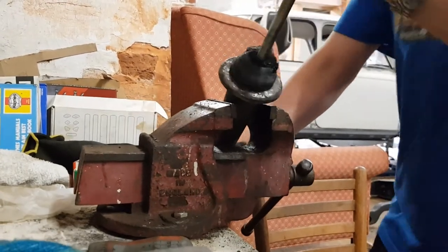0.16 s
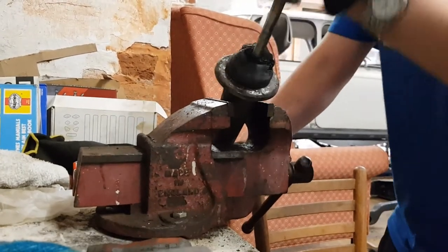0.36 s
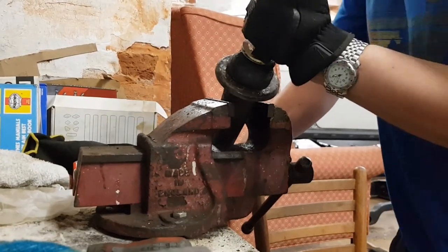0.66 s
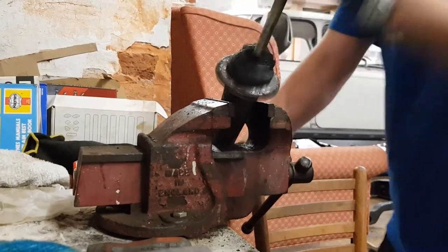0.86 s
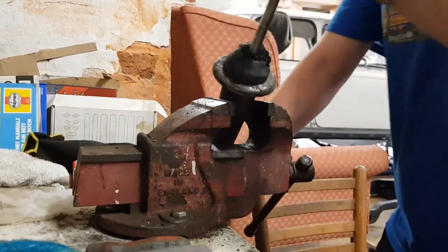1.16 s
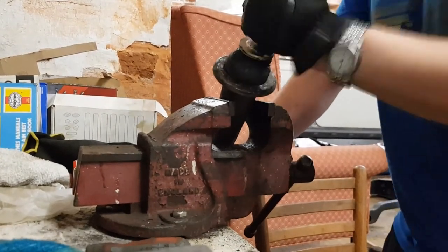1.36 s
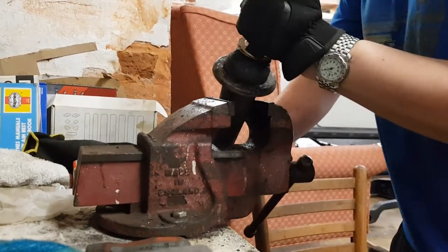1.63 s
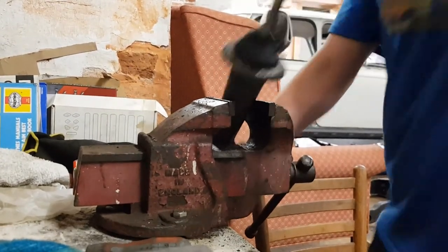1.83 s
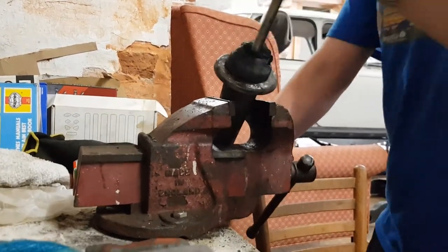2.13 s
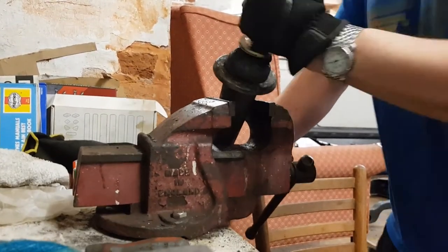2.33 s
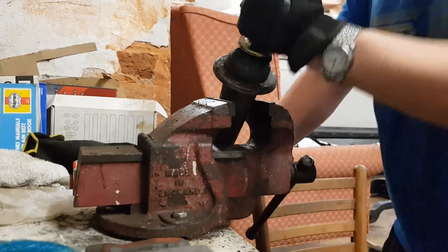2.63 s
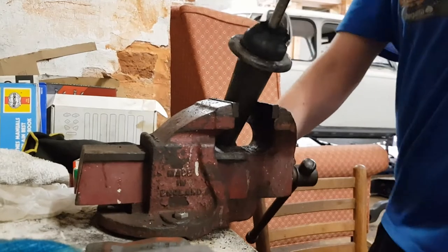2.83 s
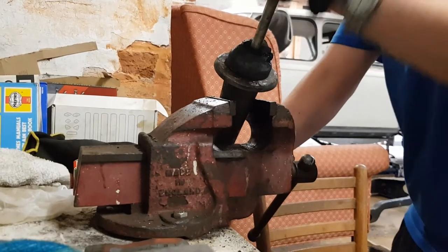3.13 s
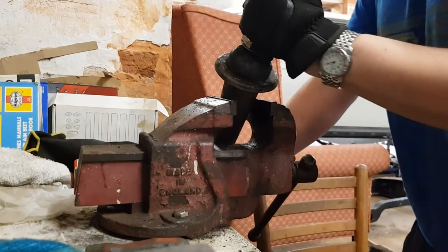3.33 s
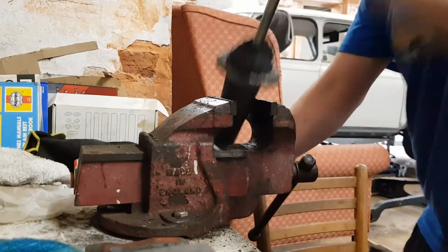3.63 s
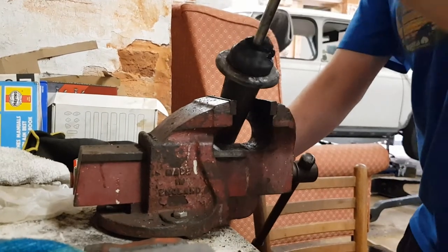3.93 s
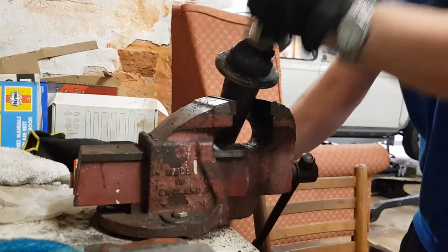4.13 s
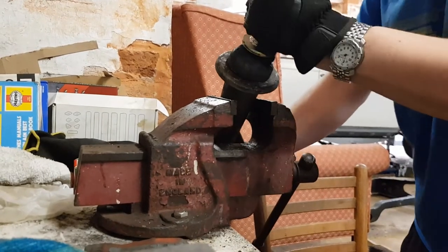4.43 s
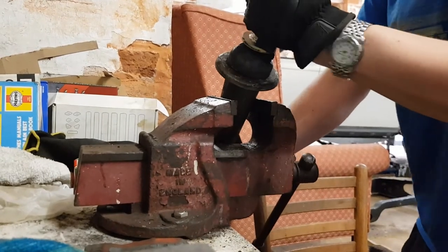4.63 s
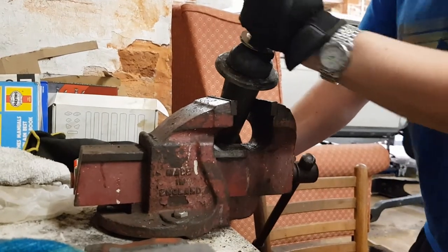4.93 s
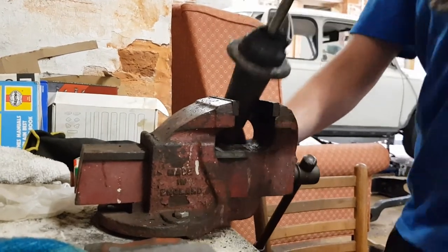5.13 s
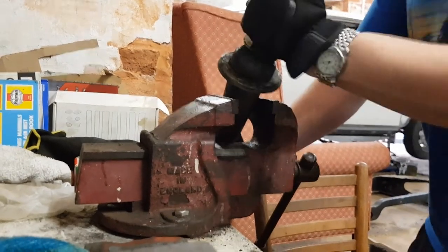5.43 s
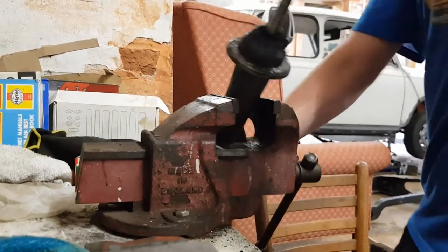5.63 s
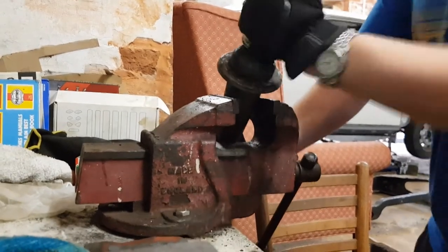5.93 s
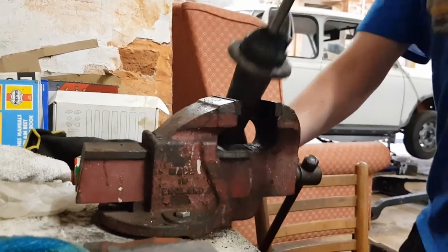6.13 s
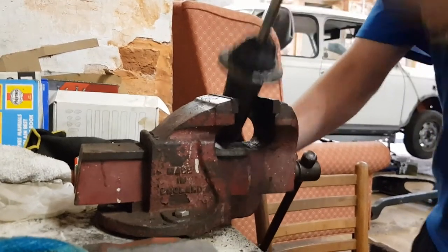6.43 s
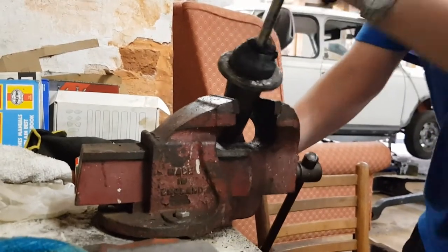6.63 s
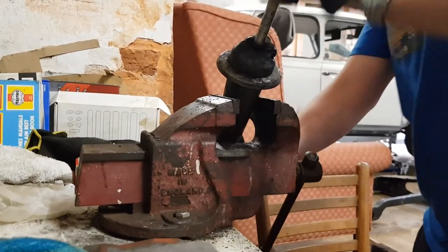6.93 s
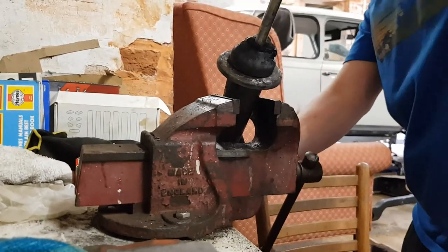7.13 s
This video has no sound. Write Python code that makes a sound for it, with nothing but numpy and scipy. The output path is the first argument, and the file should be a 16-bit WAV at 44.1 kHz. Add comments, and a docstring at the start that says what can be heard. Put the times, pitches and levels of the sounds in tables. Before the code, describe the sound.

A close stereo pickup in a small workshop catches a steel weight sliding on a rod, slightly left. A faint crack opens at 0 s, followed by small clinks and scraping. Hard, bright clangs strike at about 0.9, 1.8, 2.7 and 3.6 s, each with a sharp crack, hollow pock, about a fifth of a second of metallic chatter, thin high ringing and a low bench jolt. Between them the weight rasps back, the rod ticks and rattles, and the part clinks and drops with dry knocks. From 3.9 to 4.9 s there are only lighter taps and slides. The strongest blow lands at 5.0 s, then faster ones at 5.6, 6.0 and 6.4 s, with busy clanks, a firm scrape around 6.25 s and thuds between. Light clinks lead to a weak tap near 7.0 s, then a faint thump and near silence. Echoes are short and dense.

```python
"""A sharp metal crack comes first: a steel weight slides along a rod and slams into its stop.
Each contact is noise that chatters through the rod and vise tones; the weight sings two high tones.
The part in the vise clinks, jumps and drops back with dry knocks, and soft pushes make the bench boom.
Between contacts the sliding weight scrapes. Fading noise echoes give a small workshop's short tail.
A gate pulls quiet moments down further."""
import sys
import numpy as np
from scipy import signal
from scipy.fft import rfft, irfft
from scipy.io import wavfile

SR = 44100
rng = np.random.default_rng(int(sys.argv[2]) if len(sys.argv) > 2 else 0)


def to_wav(s):
    """Save 16-bit WAV."""
    ch = np.atleast_2d(s).T  # columns
    pcm = np.round(np.clip(ch, -1, 1) * 32767)  # PCM
    wavfile.write(sys.argv[1], SR, pcm.astype(np.int16))


N = 320430

# Levels below are relative settings; filters and mixing shape the final loudness.
# Hard blows of the weight on its stop: (time [s], level [dB], treble re level [dB], crack re level [dB],
# chatter time to fall 60 dB [s], collar ring [dB], bench jolt [dB], rocking afterwards [dB])
HARD_BLOWS = [(0.0014, -24.5, -1, 18, 0.31, -59, -36, -43.5), (0.873, -7.5, 5, 3.5, 0.2, -39, -31, -42.5),
              (1.8047, -11.5, 7, 5, 0.24, -26, -36.5, -42.5),
              (2.703, -8, 4, 1.5, 0.21, -18.5, -25.5, -39.5), (3.627, -12, 7, 8, 0.22, -23.5, -31.5, -43),
              (5.03, -6.5, 2, 5.5, 0.22, -24, -29, -37.5), (5.5796, -11.5, 8, 5.5, 0.21, -57, -30.5, -37),
              (6.018, -10, 5.5, 6.5, 0.2, -41, -40, -34.5), (6.4247, -10.5, 6, 8, 0.2, -27, -30, -35),
              (6.984, -29.5, 16, 10.5, 0.069, -64, -39.5, -72)]
# The weight taps the rod or its rests: (time [s], level [dB], treble re level [dB],
# weight ring [dB], chatter time to fall 60 dB [s])
ROD_TAPS = [(.32, -55, -10, -48, .08), (0.3589, -62, -28, -40, 0.043), (0.5739, -47.5, -18, -36, 0.38),
            (0.72, -38, 6, -35, 0.06), (.733, -36.5, 9.5, -27, 0.059), (0.9434, -9, 1, -46, 0.024),
            (1.319, -28.5, 1, -42, 0.062), (1.425, -50, -33, -45, 0.28), (1.5075, -29, -7.5, -32.5, 0.036),
            (1.605, -27.5, 2.5, -32, 0.024), (1.784, -20, 8.5, -22, 0.18), (2.271, -32, -13, -36, 0.1),
            (2.2977, -18.5, -10, -28.5, 0.028), (2.445, -49, 1, -38, 0.037), (2.4557, -34, 0, -35.5, 0.048),
            (2.58, -42.5, 4.5, -33, 0.49), (3.145, -45, -3, -36, .08), (3.1788, -29, -23, -41, 0.15),
            (3.263, -44.5, -7, -46, 0.038), (3.291, -43, -6, -42, 0.036), (3.321, -41.5, -4, -55, 0.037),
            (3.4316, -29.5, 8.5, -26.5, 0.041), (3.5177, -52.5, 12.5, -32.5, 0.27),
            (3.572, -55, 9, -39.5, 0.041), (4.0494, -41, -19, -36, 0.055),
            (4.0574, -30.5, -29, -30.5, 0.13), (4.1403, -21, -24, -37, 0.056),
            (4.1594, -30, -22, -46, 0.038), (4.2223, -60, -3, -32.5, 0.024), (4.4447, -44, 14, -24.5, 0.2),
            (4.574, -36, -17, -41, 0.061), (4.599, -45, -1, -48, .04), (4.65, -64.5, 3, -52, .05),
            (4.681, -54.5, 18, -39, 0.047), (4.935, -62.5, -9, -51.5, 0.04),
            (5.262, -46, -10, -42.5, 0.069), (5.343, -17.5, -3, -51, 0.024),
            (5.3515, -12.5, 2.5, -27.5, 0.065), (5.452, -44, -10, -37, 0.1),
            (5.534, -28.5, -14.5, -58, 0.087), (5.5575, -27.5, 20.5, -59, 0.061),
            (5.7225, -17, -13, -46, 0.083), (5.768, -18.5, -19, -39, 0.062), (5.8175, -12, 1.5, -26, 0.061),
            (5.845, -37, -2, -38, 0.077), (5.9467, -34.5, -18, -43.5, 0.33), (6.0058, -19, 7.5, -27, 0.077),
            (6.25, -16.5, -8, -32, 0.12), (6.322, -45, -11, -36.5, 0.075), (6.413, -30.5, 16.5, -18, 0.084),
            (6.7336, -16, 4.5, -44, 0.026), (6.7562, -43, -8, -25.5, 0.026), (6.937, -47, 6, -23, 0.11),
            (6.964, -23, 1, -26.5, 0.041), (6.977, -23, 16, -41, 0.05)]
# The part clinks in the vise jaws: (time [s], level [dB], body re level [dB])
JAW_CLINKS = [(0.14, -25, -1), (0.411, -25, 1), (0.4803, -30.5, -7.5), (0.542, -34, -4), (.591, -56, -7),
              (.651, -40, -4), (1.088, -29, 1), (1.198, -29, 3), (1.279, -35, 8.5), (1.355, -23.5, -0.5),
              (1.364, -22.5, -11), (2.026, -48.5, 24), (2.129, -34.5, 7.5), (2.178, -52, 3),
              (2.31, -16, -4.5), (2.398, -38, -3.5), (2.541, -45, -4), (3.0122, -25.5, 1.5),
              (3.112, -38.5, -0.5), (3.345, -37, 1), (3.9065, -34.5, 2), (3.9414, -26, -5),
              (4.252, -32, -38), (4.725, -43.5, -12.5), (4.9025, -62.5, 25), (5.168, -30.5, 16.5),
              (5.238, -19.5, -10), (5.828, -16, -6), (6.079, -26.5, 12.5), (6.267, -27, -13),
              (6.561, -37.5, 17.5), (6.592, -40, 2), (6.643, -32.5, 10), (6.898, -39, 8)]
# Longer loose rattles of the rod: (time [s], level [dB], body re level [dB], treble re level [dB])
ROD_RATTLES = [(0.808, -31.5, -2.5, -12), (.829, -30.5, -9, -1), (1.7368, -37.5, 2.5, -36),
               (2.154, -38.5, 4, -9), (3.137, -39.5, 1, 0), (3.555, -47, 4, -5.5), (3.584, -52, 0, -9),
               (4.007, -49.5, 11, -26), (4.4978, -40.5, -2, -15), (4.933, -36.5, 2, -23),
               (4.984, -24, -8.5, -18), (5.2845, -38, 5.5, -27), (6.167, -25.5, -1, -16),
               (6.374, -34, 1.5, -4), (6.682, -31.5, -1.5, -13), (6.932, -60, -1, 27.5)]
# The weight is slid back down the rod: (time of fastest sliding [s], scrape [dB])
BACK_SLIDES = [(.38, -45), (1.33, -44), (2.24, -56), (3.1, -49), (4.17, -42.5), (4.548, -56), (5.2, -48),
               (5.798, -39), (6.25, -33.5), (6.599, -39)]
# The part drops back on the vise: (time [s], knock [dB], boom re knock [dB])
PART_LANDINGS = [(0.234, -26, -6.5), (.305, -40, 3), (.945, -30.5, -9.5), (1.091, -34, -1),
                 (1.166, -25.5, -5), (2.025, -34, -34), (2.133, -22, -6.5), (2.956, -26, -8),
                 (3.698, -30, -9), (3.821, -29, -6), (4.149, -33.5, -9.5), (5.165, -31.5, -1.5),
                 (5.258, -30.5, 5), (5.478, -32.5, -8), (5.83, -27, -1.5), (6.168, -27.5, -20),
                 (6.563, -31.5, -7), (6.649, -21, -8.5)]
# The vise lurches and jolts the bench: (time [s], knock [dB])
VISE_LURCHES = [(0.143, -37.5), (0.466, -41.5), (0.723, -58), (1.36, -38.5), (1.872, -37), (2.3, -37.5),
                (3.186, -40), (3.432, -55.5), (4.5, -43), (4.598, -52), (4.686, -49), (4.975, -39.5),
                (5.366, -33), (6.273, -29), (7.147, -57)]
# Body, middle and treble of a contact: (edge or edges [Hz], filter kind)
CONTACT_BANDS = [(3000, "low"), ([3000, 8500], "band"), (8500, "high")]
# Tone colour of the broad clang: (pitch [Hz], relative level [dB])
CLANG_COLOUR = [(290, -46), (500, 19), (679, 15.5), (1250, 17), (1350, 19), (1800, 17.5), (3460, 7),
                (4700, 10), (5210, 20.5), (5930, 8.5), (6970, 13), (7490, 13), (11900, 9.5), (15100, 6),
                (16200, 3.5)]
# Rod and vise tones: (pitch [Hz], width [Hz], under a hard blow [dB], under a light contact [dB])
ROD_TONES = [(1292, 82, 12.5, 13), (1600, 130, 4, -2), (1825, 40, 3.5, 16.5), (1915, 700, 0.5, 3.5),
             (2220, 11, -5.5, -12), (2673, 35, -9, 14), (4600, 120, 9.5, 10.5), (3844, 110, -6, -5.5),
             (4214, 65, -2, 7), (4550, 420, -4.5, -6), (5980, 263, 1.5, -0.5), (6335, 50, 10, -1),
             (7550, 560, -3, 3), (7630, 110, 6, 14.5), (8520, 38, 11, 18.5), (11700, 170, -6, 16),
             (12460, 150, 6.5, 1), (13800, 450, -2, 3)]
# Neighbours of each rod tone: (steps from its pitch [cluster spacings])
CLUSTER_STEPS = [-1, 0, 1]
# The weight's split pair of tones, which beat: (pitch [Hz])
WEIGHT_PITCHES = [9576, 9748]
# How long those two tones ring: (time to fall 60 dB [s])
WEIGHT_RING_TIMES = [0.27, 0.22]
# Bench tones: (pitch [Hz], level [dB], time to fall 60 dB [s])
BENCH_TONES = [(59.3, 7, 0.15), (118.1, 5, 0.16), (206.2, 8, 0.044), (272.3, 6, 0.03), (323.3, -5, 0.044),
               (412.8, -14.5, 0.23), (553, -18.5, 0.17), (740, 0.5, 0.019), (856, -12.5, 0.051)]
# Tones of the dry knock: (pitch [Hz], level [dB], time to fall 60 dB [s], at least 0.005 when rung)
KNOCK_TONES = [(451, 8.5, 0.011), (802, -5, 0.018), (1210, -15, 0.0065), (1860, -11, 0.0023)]
# How long the workshop answers: (pitch [Hz], time to fall 60 dB [s])
SHOP_TIMES = [(100, 0.22), (400, 0.31), (1500, 0.46), (5000, 0.32), (15000, 0.22)]
# How strongly the workshop answers: (pitch [Hz], tail level [dB])
SHOP_LEVELS = [(80, -14.5), (300, -8.5), (800, -4), (4000, -1), (15000, -2.5)]

BLOW_BODY_DB, BLOW_BODY_PER_TREBLE, BLOW_RING_DB = -6, 0.022, -32
BLOW_RISE_S, BLOW_CLICK_DB = 0.015, 4.5   # chatter swells after the crack; click is re crack
COLLAR_HZ, COLLAR_T60_S = 5779, 0.04
POCK_HZ, POCK_T60_S, POCK_DB = 1500, 0.0075, -8.5
TAP_BODY_DB, BODY_PER_TREBLE = -4, -0.72
BODY_PER_STRENGTH, FIRM_TAP_DB = 0.049, -39.5
CLINK_TREBLE_DB, CLINK_RING_DB, CLINK_T60_S = -9.5, -34, 0.043
RATTLE_RING_DB, RATTLE_T60_S = -16, 0.32
HARD_SPREAD, LIGHT_SPREAD = 0.014, 0.005   # cluster spacing, share of the pitch
CLUSTER_BLOCK, CLUSTER_LUCK_DB = 900, 7.5   # tones take turns about every 20 ms (block in samples)
GRIP_FLUTTER, GRIP_HZ = 0.35, 60
NICKS_PER_S, NICK_DB = 60, 17   # burrs caught by the sliding weight
SLIDE_FADE_DB_PER_S = 96
THROW_DB, THROW_RISE_DB_PER_S = -33.5, 118
THROW_S, FLIGHT_S = 0.05, 0.005   # the throw scrapes briefly, then the weight flies free
LAND_DEEP_DB = -21.5
LURCH_BOOM_DB, LURCH_DEEP_DB = 3, 6
JOLT_BOOM_DB, JOLT_DEEP_DB, JOLT_LAG_S = -2.5, 6, 0.004615
BOUNCE_S, BOUNCE_DB = 0.0085, -12   # the part bounces once more
SETTLE_DB, SETTLE_FADE_DB_PER_S = -3.5, 98.5
ROCK_RISE_S, ROCK_HOLD_S = 0.03, 0.13
ROCK_RISE_DB_PER_S, ROCK_FADE_DB_PER_S = 157, 53.5
RIGHT_LAG = 17   # samples by which the right side hears the metal later
BASS_CUT_HZ, CUTOFF_HZ = 74.6, 15850
GATE_DB, GATE_SLOPE, GATE_RELEASE_S = -62, 0.8, 0.03   # slope: extra dB down per dB below threshold


def blows():
    """Hard blows open with a hollow pock and shake the collar, which rings on noise for a while."""
    s, level, treble, crack_db, t60, collar, _, _ = np.transpose(HARD_BLOWS)
    body = BLOW_BODY_DB + BLOW_BODY_PER_TREBLE * treble
    rows = s, level, body, treble, np.full(len(s), BLOW_RING_DB), t60
    clang = contacts(rows, chatter_db=-4.5, crack_db=crack_db, crack_s=0.013,
                     modes_db=np.transpose(ROD_TONES)[2], luck_db=5.5, ring_db=-12.0,
                     rise_s=BLOW_RISE_S, click_db=BLOW_CLICK_DB, spread=HARD_SPREAD)
    shaken = rng.standard_normal(N) * bursts(s, collar - 15, 0.57 * t60, 0.01)
    pock = ring(clicks(s, amp(level + crack_db + POCK_DB)), POCK_HZ, POCK_T60_S)
    return clang + pock + ring(shaken, COLLAR_HZ, COLLAR_T60_S)


def light_contacts():
    """Taps, clinks and rattles in time order; bright taps have less body, firm taps more."""
    rows = []
    for s, db, treble, sing, t60 in ROD_TAPS:
        body = TAP_BODY_DB + BODY_PER_TREBLE * max(treble, 0)
        body += BODY_PER_STRENGTH * (db - FIRM_TAP_DB)
        rows.append((s, db, body, treble, sing, t60))
    for s, db, body in JAW_CLINKS:
        rows.append((s, db, body, CLINK_TREBLE_DB, db + CLINK_RING_DB, CLINK_T60_S))
    for s, db, body, treble in ROD_RATTLES:
        rows.append((s, db, body, treble, db + RATTLE_RING_DB, RATTLE_T60_S))
    return contacts(np.transpose(sorted(rows)), chatter_db=-2.5, crack_db=-10.0, crack_s=0.025,
                    modes_db=np.transpose(ROD_TONES)[3], luck_db=10.5, ring_db=-5.0,
                    rise_s=0.0051, click_db=-2.5, spread=LIGHT_SPREAD)


def contacts(rows, chatter_db, crack_db, crack_s, modes_db, luck_db, ring_db, rise_s, click_db, spread):
    """A crack, then chatter through the broad clang and the rod tones; the weight rings on."""
    s, level, body, treble, sing, t60 = rows
    drive, crack_noise = 0, rng.standard_normal(N)
    for (edge, kind), db in zip(CONTACT_BANDS, (level + body, level, level + treble)):
        chatter = grit(4.8, alike=0.024) * bursts(s, db + chatter_db, t60, rise_s)
        crack = crack_noise * bursts(s, db + crack_db, np.full(len(s), crack_s), 0.0005)
        click = clicks(s + 0.0012, amp(db + crack_db + click_db))
        drive = drive + filtered(chatter + crack + click, edge, kind)
    # each contact favours other tones, until the next one takes over
    latest = np.maximum(np.searchsorted(s, np.arange(N) / SR) - 1, 0)
    favoured_db = modes_db + luck_db * rng.uniform(-1.5, 0.5, (len(s), len(ROD_TONES)))
    shiver = rng.standard_normal((2, N)) * bursts(s, sing + ring_db - 32.0, t60, 0.0022)
    clang = colour(drive, CLANG_COLOUR)
    rod = rod_modes(drive, favoured_db[latest].T, spread)
    return clang + rod + weight(clicks(s, amp(sing + ring_db)) + shiver)


def rod_modes(drive, db, spread):
    """Rod and vise tones side by side; the loose fit keeps shifting which tone of each cluster speaks."""
    out = 0
    turns = rng.uniform(-1.5, 1, (len(ROD_TONES), len(CLUSTER_STEPS), N // CLUSTER_BLOCK + 2))
    for k, (hz, width, *_) in enumerate(ROD_TONES):
        t60 = np.log(1000) / (np.pi * width)   # a wider tone dies sooner
        for step, turn in zip(CLUSTER_STEPS, turns[k]):
            turn_db = CLUSTER_LUCK_DB * np.interp(np.arange(N) / CLUSTER_BLOCK, np.arange(len(turn)), turn)
            tone = ring(drive * amp(db[k] + turn_db - 6.5), hz * (1 + spread * step), t60)
            out = out + (-1) ** k * tone * 2 * np.pi * width / SR
    return out


def weight(jolts):
    """The sliding weight's two long tones, alike at both sides; the gripping hand makes them flutter."""
    grip = filtered(rng.standard_normal((2, N)), GRIP_HZ, "low")
    flutter = 1 + GRIP_FLUTTER * grip / np.std(grip)
    # each row of jolts drives one tone
    return sum(ring(jolt, hz, t60) * shake
               for jolt, hz, t60, shake in zip(jolts, WEIGHT_PITCHES, WEIGHT_RING_TIMES, flutter))


def sliding_level():
    """Scrape level in dB: short throws up into each blow, and slides back down the rod."""
    s, level, *_ = np.transpose(HARD_BLOWS)
    thrown_db = swells(s, level + THROW_DB, THROW_RISE_DB_PER_S, 0, 0)
    now = np.arange(N) / SR
    until_blow = np.append(s, 2 * N / SR)[np.searchsorted(s, now)] - now
    throwing = (until_blow < THROW_S) & (until_blow > FLIGHT_S)
    thrown_db = np.where(throwing, thrown_db, -120)
    slid_db = swells(*np.transpose(BACK_SLIDES), SLIDE_FADE_DB_PER_S, 0, SLIDE_FADE_DB_PER_S)
    return np.maximum(thrown_db, slid_db)


def scrape(db):
    """The weight rubs and rattles along the rod and keeps its tones going, now one, now another."""
    caught = rng.random(N) < NICKS_PER_S / SR
    nicks = caught * amp(NICK_DB + 6.6 * rng.standard_normal(N))
    rub = (grit(9.2, alike=0.33) + nicks) * amp(db)
    wander_db = rng.uniform(-8, 8, (N // 1800 + 1, len(ROD_TONES)))
    wander_db = np.repeat(wander_db, 1800, axis=0)[:N]   # new strengths about every 41 ms
    dull = filtered(colour(rub, CLANG_COLOUR), 9000, "low")
    rod = rod_modes(rub, (np.transpose(ROD_TONES)[3] + wander_db).T, LIGHT_SPREAD)
    return amp(-1.0) * dull + amp(-15.0) * rod + amp(-45.0) * weight(rub)


def thuds():
    """Rows (time [s], knock [dB], boom [dB], deep boom [dB]): landings are dry, blows and lurches boom."""
    landings = [(s, db, boom, LAND_DEEP_DB) for s, db, boom in PART_LANDINGS]
    lurches = [(s, db, LURCH_BOOM_DB, LURCH_DEEP_DB) for s, db in VISE_LURCHES]
    jolts = [(s + JOLT_LAG_S, db, JOLT_BOOM_DB, JOLT_DEEP_DB) for s, *_, db, _ in HARD_BLOWS]
    return landings + lurches + jolts


def bench_rumble():
    """Rumble level in dB: every thud leaves a shudder, and each blow leaves the bench rocking."""
    thud_s, knock_db, boom_db, _ = np.transpose(thuds())
    settle_db = swells(thud_s, knock_db + boom_db + SETTLE_DB, 2000, 0, SETTLE_FADE_DB_PER_S)
    s, *_, rock_db = np.transpose(HARD_BLOWS)
    rocking_db = swells(s + ROCK_RISE_S, rock_db, ROCK_RISE_DB_PER_S, ROCK_HOLD_S, ROCK_FADE_DB_PER_S)
    return np.maximum(settle_db, rocking_db)


def bench(rumble_db):
    """Soft pushes set the bench tones booming; a short knock opens each; rocking keeps it humming."""
    s, knock, boom_re, deep_re = np.transpose(thuds())
    shape = len(s), len(BENCH_TONES)
    luck = amp(rng.uniform(-4, 4, shape)) * rng.choice([-1, 1], shape)   # fresh strengths each time
    rocking = amp(rumble_db - 28.0) * rng.standard_normal(N)
    boom = np.zeros(N)
    for k, (hz, db, t60) in enumerate(BENCH_TONES):
        share = deep_re if hz < 80 else boom_re if hz < 290 else 0
        push = clicks(s, amp(knock + share + db) * luck[:, k]) + amp(db) * rocking
        half_cycle = np.hanning(round(SR / hz / 2)) * 4 * hz / SR   # how long the push lasts
        boom += ring(signal.oaconvolve(push, half_cycle)[:N], hz, t60)
    first, again = rng.uniform(-3, 3, (2, len(KNOCK_TONES), len(s)))
    knocks = 0
    for k, (hz, db, t60) in enumerate(KNOCK_TONES):
        hit = clicks(s, amp(knock + db + first[k]))
        bounce = clicks(s + BOUNCE_S, amp(knock + db + BOUNCE_DB + again[k]))
        knocks = knocks - ring(hit + bounce, hz, t60)
    rattle = rng.standard_normal(N) * bursts(s, knock - 6, np.full(len(s), 0.07), 0.00062)
    return boom + knocks + filtered(rattle, [250, 2300], "band")


def shop(x):
    """Dense echoes made of fading noise, different at each ear, lasting longest in the middle range."""
    t, tail = np.arange(SR // 2) / SR, 0
    edges = 60 * 2 ** np.arange(0, 8.6, 0.5)   # half-octave bands [Hz]
    white = rng.standard_normal((2, 2, len(t)))
    for k, (low, high) in enumerate(zip(edges, edges[1:])):
        hz = np.sqrt(low * high)
        t60 = max(at_hz(SHOP_TIMES, hz), 0.05)
        band = filtered(white[k % 2], [low, high], "band")
        even_energy = np.sqrt(6 * np.log(10) / (t60 * SR))   # offsets the extra energy of a longer tail
        tail = tail + band * amp(at_hz(SHOP_LEVELS, hz) - 60 * t / t60) * even_energy
    tail = tail * np.clip(t / 0.00045, 0, 1)   # a very short fade-in
    return signal.fftconvolve(x[None], tail, axes=1)[:, :N]


def amp(db):
    """Gain of a dB value."""
    return 10 ** (np.asarray(db) / 20)


def filtered(x, edge, kind):
    """Keep one range of pitches with gently sloping edges."""
    return signal.sosfilt(signal.butter(2, edge, kind, fs=SR, output="sos"), x)


def at_hz(points, hz):
    """Read a curve over pitch, with pitch spaced logarithmically as in hearing."""
    p = np.array(points)
    return np.interp(np.log(np.maximum(hz, 1)), np.log(p[:, 0]), p[:, 1])


def colour(x, spectrum):
    """Give x a spectrum, keeping white noise at the same average strength."""
    gain = amp(at_hz(spectrum, np.fft.rfftfreq(4096, 1 / SR)))
    cepstrum = irfft(np.log(gain))
    cepstrum[1:2048] *= 2   # folding the cepstrum makes the filter act only after its input
    cepstrum[2049:] = 0
    taps = irfft(np.exp(rfft(cepstrum)))
    taps = taps[None] / np.sqrt(np.sum(taps ** 2))
    return signal.fftconvolve(x, taps, axes=1)[:, :N]


def ring(x, hz, t60):
    """A unit click sets a sine of height 1 ringing; it takes at least 5 ms to fall 60 dB."""
    r = amp(-60 / (max(t60, 0.005) * SR))
    w = 2 * np.pi * hz / SR
    return signal.lfilter([0, np.sin(w)], [1, -2 * r * np.cos(w), r * r], x + 1e-18)


def clicks(s, gains):
    """One single-sample impulse per event."""
    out = np.zeros(N)
    np.add.at(out, np.round(np.asarray(s) * SR).astype(int), gains)
    return out


def bursts(s, db, t60, rise_s):
    """Envelope that rises quickly at each contact and dies away; overlapping contacts add in power."""
    power = np.zeros(N)
    for start, gain, length in zip(s, amp(db), np.clip(t60, 0.005, 0.6)):
        i = round(start * SR)
        t = np.arange(min(N - i, round(length * SR))) / SR
        envelope = gain * np.minimum(t / rise_s, 1) * amp(-60 * t / length)
        power[i:i + len(t)] += envelope ** 2
    return np.sqrt(power)


def grit(spread_db, alike):
    """Noise in uneven 2 ms grains, as of many tiny metal contacts, partly different at the two sides."""
    lumps = amp(spread_db * np.clip(rng.standard_normal(N // 88 + 1), -3, 2))
    lumps = np.repeat(lumps, 88)[:N]
    mid, side = rng.standard_normal((2, N))
    alike = np.clip(alike, 0, 1)
    x = lumps * (np.sqrt(1 + alike) * mid + np.sqrt(1 - alike) * side * [[1], [-1]])
    return x / np.std(x)


def swells(s, db, rise, hold_s, fade):
    """Level in dB that climbs to each moment, holds and fades; the strongest counts."""
    t = np.arange(0, N / SR + 0.01, 0.005)[:, None]
    level = db - rise * np.maximum(s - t, 0) - fade * np.maximum(t - s - hold_s, 0)
    return np.interp(np.arange(N) / SR, t[:, 0], level.max(axis=1))


def scene():
    """Everything at the vise, heard direct and through the shop; it stands left of the microphones."""
    metal = blows() + light_contacts() + scrape(sliding_level())
    wood = bench(bench_rumble()) * amp([[1.3], [-1.3]])   # a little louder on the left
    left, right = metal
    late_right = np.concatenate([np.zeros(RIGHT_LAG), right[:-RIGHT_LAG]])
    direct = np.array([left, late_right]) + wood
    sent_to_shop = np.mean(metal + amp(4.5) * wood, axis=0)
    return direct + shop(sent_to_shop)


def record(dry):
    """Drop the deepest bass, lower what falls under the gate's threshold, round peaks, cut the top."""
    dry = filtered(dry, BASS_CUT_HZ, "high")
    r = np.exp(-1 / (GATE_RELEASE_S * SR))
    power = signal.lfilter([1 - r], [1, -r], np.mean(dry ** 2, axis=0), zi=[1e-3])[0]
    level_db = 10 * np.log10(power + 1e-12)
    gated = dry * amp(GATE_SLOPE * np.minimum(level_db - GATE_DB, 0))
    rounded = 1.2 * np.tanh(gated / 1.2)
    return signal.sosfilt(signal.ellip(10, 0.5, 70, CUTOFF_HZ, fs=SR, output="sos"), rounded)


dry = scene()
out = record(dry)
to_wav(out)
```